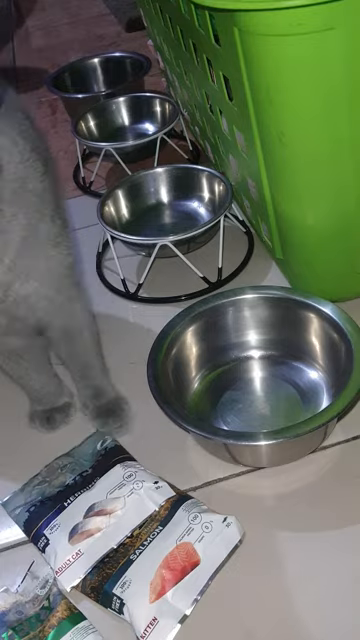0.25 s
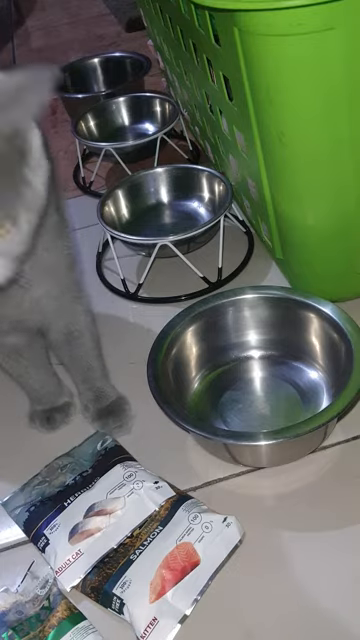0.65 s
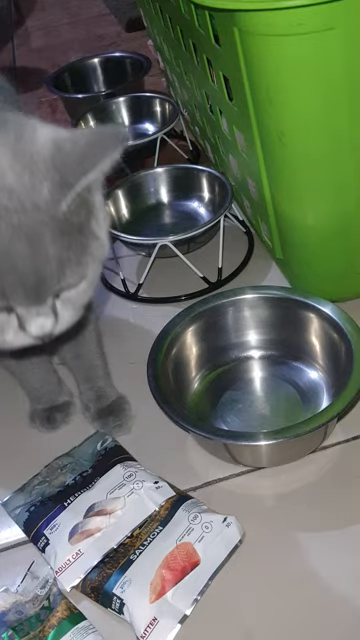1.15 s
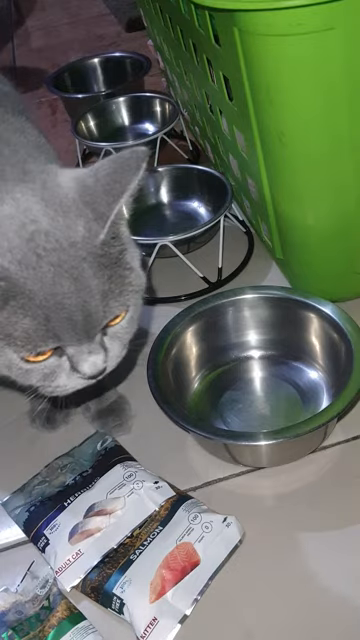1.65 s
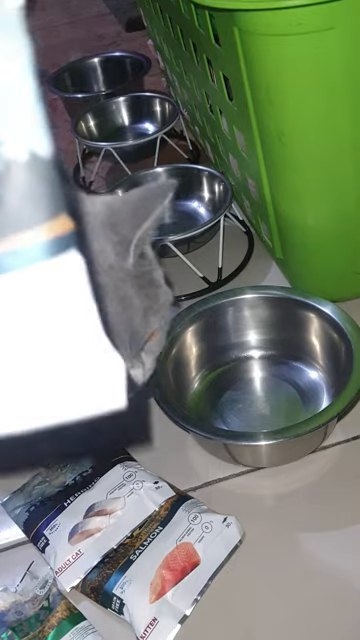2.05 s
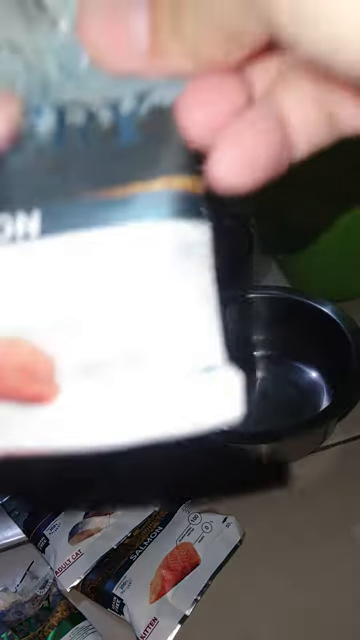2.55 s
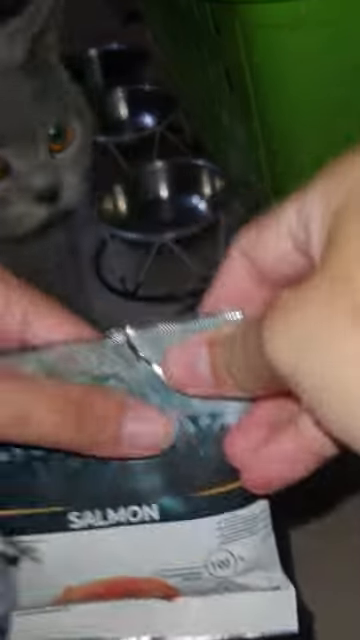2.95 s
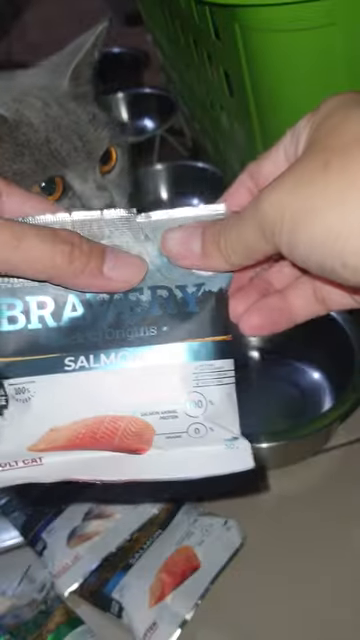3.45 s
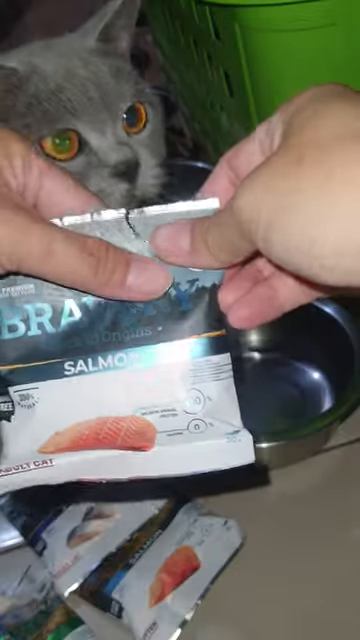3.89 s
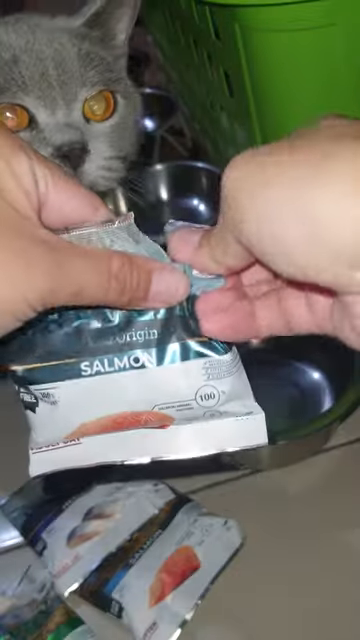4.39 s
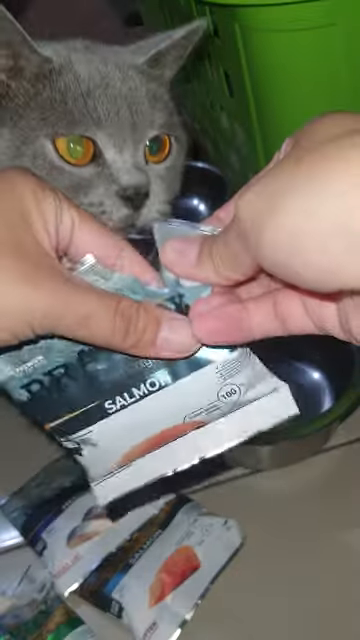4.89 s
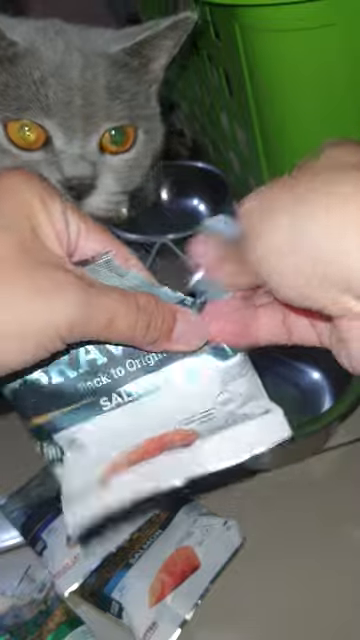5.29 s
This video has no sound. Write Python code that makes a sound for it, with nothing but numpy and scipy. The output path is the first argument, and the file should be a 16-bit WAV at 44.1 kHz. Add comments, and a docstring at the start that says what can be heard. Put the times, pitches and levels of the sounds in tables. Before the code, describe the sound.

A scraping load drops onto a hollow box with a bright metallic clink, then hands crinkle and tear a foil pouch over low motor hum.

```python
"""Motors hum over a low rumble in a tiled room; near the phone something scrapes, clacks and jingles, and a load
drops on a hollow box, then hands crinkle and tear a foil pouch close by. Struck box, foil and bumps are noise
bursts or sines through resonances, metal parts are decaying sines, rustles and scrapes are coloured stereo
noise with moving levels, and the motors are steady-pitched sines. Foil, bumps and blows also excite a room tail."""
import sys
import numpy as np
from scipy import signal
from scipy.fft import rfft, irfft, next_fast_len
from scipy.io import wavfile
from scipy.ndimage import uniform_filter1d, map_coordinates

SR = 44100
rng = np.random.default_rng(int(sys.argv[2]) if len(sys.argv) > 2 else 0)


def to_wav(s):
    """Save 16-bit WAV."""
    ch = np.atleast_2d(s).T  # columns
    pcm = np.round(np.clip(ch, -1, 1) * 32767)  # PCM
    wavfile.write(sys.argv[1], SR, pcm.astype(np.int16))


N = 243873

# Creases that snap in the foil. Each row: start in seconds, strength in dB, panel pitch in Hz,
# treble level in dB, pitch of the loose corner in Hz.
CREASES = [(1.834, -42, 3200, -20, 800), (2.334, -35, 1980, -1, 1140), (2.3696, -35.5, 3080, -15, 3200),
           (2.4207, -21.5, 2270, 0, 3100), (2.432, -17.5, 3900, -6, 1040), (2.52, -31, 2560, 7, 1340),
           (2.548, -28, 2200, 9, 1770), (2.576, -28.5, 4800, -9, 2920), (2.6245, -20.5, 5250, 43, 810),
           (2.641, -27, 2450, -20, 1010), (2.649, -29, 6000, 10, 1500), (2.691, -33.5, 1900, -25, 1300),
           (2.701, -31.5, 1400, -27, 1010), (2.759, -36, 2800, -13, 3450), (2.913, -31, 2600, -25, 1520),
           (2.9253, -20, 2160, -1, 2800), (2.946, -35, 2500, -20, 2400), (2.9819, -23.5, 2350, -5, 2500),
           (2.993, -38, 6000, -20, 3000), (3.02, -34, 1950, -3, 1610), (3.117, -37, 3720, -20, 2000),
           (3.356, -35.5, 2370, -8, 1500), (3.361, -29.5, 2700, -1, 2920), (3.9487, -23.5, 3620, 15, 1110),
           (3.981, -22.5, 3000, -2, 1190), (4.0972, -27, 3000, -1, 1310), (4.1083, -20, 5600, -30, 4800),
           (4.2603, -34, 1360, -18, 1380), (4.271, -19.5, 5900, 18, 3920), (4.2787, -19, 1470, 12.5, 1320),
           (4.313, -28, 3670, 17.5, 1790), (4.3537, -27.5, 3680, 12, 3440), (4.364, -19, 4600, -15, 1930),
           (4.431, -22, 4150, 10.5, 1340), (4.462, -33, 1920, -15, 985), (4.52, -15.5, 5600, -25, 2620),
           (4.5335, -20.5, 2010, -28, 1320), (4.579, -20, 3480, -19, 2100), (4.588, -22.5, 2200, -20, 1820),
           (4.597, -18, 5350, 4, 940), (4.609, -24, 3200, -12, 2430), (4.614, -10, 3570, 14, 1310),
           (4.653, -23, 5100, -21, 2730), (4.7103, -19, 2550, 3, 920), (4.7236, -11.5, 4500, -15, 1150),
           (4.7386, -9.5, 5270, -7, 4300), (4.776, -26, 2580, -10, 2470), (4.8004, -20.5, 4640, -20, 2640),
           (5.0163, -17.5, 4800, 3, 1000), (5.086, -26, 2980, -6, 1310), (5.0927, -26.5, 4430, -2, 2400),
           (5.1931, -30.5, 3430, 1, 1210), (5.203, -31.5, 2780, 0, 1440), (5.3086, -25, 1280, 10, 1390),
           (5.3417, -22, 2050, 9, 1350), (5.349, -16, 3840, 2, 910), (5.359, -24, 2550, -10, 1180),
           (5.3672, -3.5, 4470, -9, 2040), (5.3868, -14, 5430, -10, 1890), (5.4103, -5.5, 7900, 14, 5770),
           (5.418, -38, 2200, -20, 1090), (5.4612, -19, 3630, 8, 2250)]
# Where the pouch is held. Each row: time in seconds, left minus right in dB.
POUCH_SIDE = [(2.15, -15), (2.4, 0), (2.7, 3), (2.8, -5), (3.05, -6), (3.4, -4), (4.6, -3.5), (5.53, -5)]
# How alike the two ports hear a wide sound. Each row: frequency in Hz, left-right likeness (1 is identical).
PORT_LIKENESS = [(60, 0.3), (290, 0.8), (640, 0.21), (1400, -0.34), (3000, -0.0081)]


def snaps():
    """A crease flips: a spike and a few ms of chatter ring the foil panel, its loose corner and its facets."""
    mix, t = np.zeros((2, N)), np.arange(SR // 25) / SR
    crack_db = 5.5  # peak of a snap over its strength
    for s, strength_db, hz, top_db, corner_hz in CREASES:
        chatter = rng.standard_normal((3, len(t)))
        facets = hz * np.exp(0.537 * rng.standard_normal((6, 2, 1)))  # each port faces other facets
        burst = (chatter[0] + chatter[1:]) * amp(-60 * t / 0.019) * (1 - np.exp(-t / 0.0007))
        burst[:, 14] += 7  # the spike, 0.3 ms in

        def foil(f):
            panel = 0.33 * resonance(hz, 2.4 * hz)(f) ** 2
            corner = 0.79 * resonance(corner_hz, 0.45 * corner_hz)(f) ** 2
            small = 0.23 * sum(resonance(c, 0.09 * c)(f) for c in facets)
            treble = amp(top_db - 16.5) * resonance(12000, 9000)(f) ** 2
            return panel + corner + small + treble

        side_db = np.interp(s, *np.transpose(POUCH_SIDE))
        add(mix, s, filtered(burst, foil), strength_db + crack_db, side_db)
    return lead(mix, 0.00013)


def rustle():
    """Fingers slide on the film: lumpy noise, fine crackle, sheen and the bag's low crumple; snaps stir it up."""
    # Fingers working the pouch. Each row: time in seconds, rustle in dB, sheen in dB, low crumple in dB.
    hands = [(1.75, -81.5, -81, -71), (1.86, -64.5, -73, -56.5), (1.93, -81.5, -79, -69.5),
             (2.29, -74, -82, -64), (2.39, -55, -65, -46), (2.5, -53, -59, -49), (2.55, -42, -61, -44.5),
             (2.68, -52, -50, -51), (2.8, -55.5, -58.5, -56.5), (3.3, -55.5, -54.5, -58),
             (3.4, -62, -65, -59), (3.65, -69.5, -71.5, -66), (3.95, -56, -56, -61.5), (4.2, -60, -78, -56),
             (4.3, -52, -71, -70), (4.6, -52, -57, -52.5), (4.72, -52, -74, -53), (4.89, -53.5, -43, -59.5),
             (5.09, -49.5, -91, -48.5), (5.16, -58.5, -66, -57), (5.32, -58.5, -61, -53),
             (5.53, -55, -57, -56)]
    # Colours of film, sheen and bag. Each row: frequency in Hz, relative level in dB per Hz.
    film_colour = [(500, 1), (1200, 1.5), (3000, -3.5), (6000, -3.5), (9000, -10), (15800, -21)]
    sheen_colour = [(4000, -30), (7000, -4), (10000, -8.5), (15000, -1.5), (15800, -12)]
    bag_colour = [(200, 6.5), (350, 10.5), (900, 1.5), (1600, -34)]
    slide_db, shine_db, bag_db = curves(hands)
    s, strength_db = np.transpose(CREASES)[:2]
    # the film strains before each snap and settles after it
    rise = 0.011  # s
    settle_db = swells(s - rise, 0 * s + rise, 0 * s, strength_db - 28.5, fall_db_s=295)
    settle = amp(settle_db)
    film = np.hypot(amp(slide_db), settle)
    sheen = np.hypot(amp(shine_db), amp(-7) * settle)
    mix = film * rush(film_colour, [(0, 0.0074)], grain_db=3.0, rate=190, patchy_db=2.0)
    mix += amp(-1.5) * film * crackle(1300, spread_db=4.0)
    mix += sheen * rush(sheen_colour, [(0, 0.01)], grain_db=1.0, rate=78, patchy_db=2.5)
    mix += amp(bag_db) * rush(bag_colour, PORT_LIKENESS, grain_db=3.5, rate=50)
    side_db = np.interp(np.arange(N) / SR, *np.transpose(POUCH_SIDE))
    return mix * amp(side_db * [[0.5], [-0.5]])


def crackle(rate, spread_db):
    """Tiny creases at random moments, rate a second, each a damped panel of its own pitch and side."""
    draw = rng.random((int(rate * N / SR), 5))
    moment, pitch, size, side, delay = (draw[:, k:k + 1] for k in range(5))
    t = np.arange(200) / SR
    hz = 700 * 9 ** pitch
    level_db = -spread_db * np.log(1 - 0.97 * size) - 60 * t * hz / 14  # 60 dB down after 14 cycles
    grain = np.sqrt(hz) * amp(level_db) * np.sin(2 * np.pi * hz * t)
    start = (moment * N).astype(int) + np.arange(200)
    ports = []
    for k in range(2):
        late = start + k * (12 * delay).astype(int)  # the right port lags by up to 11 samples
        ports.append(np.bincount(late.ravel(), (grain * np.abs(k - side)).ravel(), N + 300)[:N])
    return unit(np.array(ports))


def rubs():
    """A thumb slides over the film: smooth airy strokes of noise."""
    # Strokes. Each row: start in seconds, rise in seconds, held in seconds, level in dB.
    strokes = [(3.06, 0.039, 0.072, -50.5), (3.21, 0.03, 0.055, -56), (4.85, 0.013, 0.029, -47),
               (4.965, 0.028, 0.0084, -43)]
    # Each row: frequency in Hz, relative level in dB per Hz.
    stroke_colour = [(2200, -11), (3400, -1.5), (5500, -2.5), (7000, -13), (12000, -12)]
    s, rise, held, db = np.transpose(strokes)
    level_db = swells(s, rise, held, db, fall_db_s=500) + [[-2.2], [2.2]]  # stronger on the right
    return amp(level_db) * rush(stroke_colour, [(0, 0.045)], grain_db=-3.0, rate=98)


def bumps():
    """Soft bumps of hands and bag: one dull mode each, with the tick of the contact."""
    # Each row: start in seconds, peak in dB, pitch in Hz.
    contacts = [(1.834, -38, 345), (2.15, -42, 890), (2.285, -35.5, 410), (2.39, -32, 990),
                (2.533, -34, 460), (2.55, -31, 287), (2.719, -34, 880), (2.856, -32, 507), (3.132, -34, 75),
                (3.36, -22, 925), (4.444, -38, 1260), (4.777, -27, 334), (4.898, -33, 1190),
                (4.918, -34, 1260), (5.072, -28, 860), (5.412, -30.5, 344), (5.443, -33, 1160),
                (5.51, -23.5, 134)]
    mix, t = np.zeros((2, N)), np.arange(SR // 5) / SR
    for s, db, hz in contacts:
        fade = amp(-60 * t / (0.012 + 7 / hz))  # lower modes ring longer
        ring = np.sin(2 * np.pi * hz * t) * fade * (1 - np.exp(-t / 0.00053))
        noise = rng.standard_normal((2, len(t))) * amp(-60 * t / 0.042)
        tick = filtered(noise, lambda f: resonance(1.8 * hz, 2.5 * hz)(f) ** 2)
        add(mix, s, ring + 0.91 * tick, db, -3)
    return lead(mix, 0.000067)


def knocks():
    """Blows on the hollow box: a soft push and some ms of rattle drive its modes."""
    # Each row: start in seconds, peak in dB, boost of the modes under 250 Hz in dB.
    blow_rows = [(0.268, -24.5, -1), (0.294, -24, 10), (0.75, -28, -4), (0.784, -26, -7), (0.863, -25, -6),
                 (0.898, -17.5, -25), (0.955, -15, -8), (0.967, -10, -19), (1.0, -1.5, -18),
                 (1.01, -12.5, -15), (1.056, -5, 2), (1.066, -14, -10), (1.102, -16, 25)]
    # Modes of the box. Each row: frequency in Hz, width in Hz, level in dB.
    modes = [(71.4, 10.5, 3.5), (150, 77, 0.5), (413, 69, 0.5), (498, 21, 9.5), (788, 118, 6),
             (920, 106, 6.5), (1760, 200, -6.5)]
    mix, t = np.zeros((2, N)), np.arange(SR // 4) / SR
    for s, db, bass_db in blow_rows:

        def box(f):
            total = 0
            for k, (hz, width, level_db) in enumerate(modes):
                boost_db = bass_db if hz < 250 else 0
                total = total + (-1) ** k * amp(level_db + boost_db) * resonance(hz, width)(f)
            return total

        chance = rng.standard_normal((3, len(t)))
        push = t / 0.000386 * np.exp(-t / 0.00026)
        rattle = 0.38 * amp(-60 * t / 0.047) * (chance[0] + 0.36 * chance[1:])
        add(mix, s, filtered(push + rattle, box) * amp(-60 * t / 0.29), db, -2.5)
    return lead(mix, 0.00021)


def clinks():
    """Small metal parts clink: decaying sines, rebalanced and slightly retuned at each contact."""
    # Each row: start in seconds, peak in dB.
    contacts = [(0.785, -40), (0.9542, -27), (0.9644, -18), (0.985, -21), (1.0394, -36)]
    # Metal parts. Each row: frequency in Hz, level in dB.
    parts = [(8760, -8.5), (11140, -4), (13460, -3), (14800, -9), (15500, 6)]
    mix, t = np.zeros((2, N)), np.arange(SR // 3) / SR
    for s, db in contacts:
        ring = 0
        for hz, level_db in parts:
            port_db = level_db + rng.normal(0, 2.7, (2, 1))  # each port hears its own balance
            cycles = hz * rng.normal(1, 0.0078) * t + rng.random((2, 1))
            ring = ring + amp(port_db - 60 * t / 0.13) * np.sin(2 * np.pi * cycles)
        add(mix, s, ring, db, -4)
    return mix


def shuffle():
    """The load is shoved along: swelling noise booms in the box, scrapes the tiles and hisses."""
    # Each row: start in seconds, rise in seconds, held in seconds, boom in dB, scrape in dB, hiss in dB.
    shoves = [(0.001, 0.0013, 0.03, -47.5, -56, -58.5), (0.091, 0.004, 0.01, -45.5, -55, -67),
              (0.2, 0.056, .01, -70, -55, -56), (0.255, 0.014, 0.02, -36.5, -43.5, -45),
              (0.553, 0.01, 0.012, -44.5, -46, -56), (0.724, .006, .015, -64, -64, -58),
              (0.742, 0.0074, 0.033, -40.5, -46, -50), (0.78, 0.0042, 0.023, -30.5, -38.5, -38),
              (0.81, 0.076, 0.086, -30, -40.5, -39), (0.916, 0.044, 0.016, -24, -27.5, -30.5),
              (0.997, 0.0051, 0.0052, -17, -33, -33), (1.049, 0.0088, 0.018, -25, -37, -38),
              (1.173, 0.0044, 0.01, -58, -53, -43.5)]
    # Colours of the three noises. Each row: frequency in Hz, relative level in dB per Hz.
    boom_colour = [(40, -16), (100, -9), (200, -7), (240, -22.5), (465, -10.5), (600, -19), (800, -8.5),
                   (1190, -23.5), (1800, -30)]
    scrape_colour = [(900, 2), (1800, -0.5), (3000, -1), (6000, -2), (9000, -6.5)]
    hiss_colour = [(6000, -26), (9000, 2.5), (13000, 8.5), (15800, 9)]
    s, rise, held, boom_db, scrape_db, hiss_db = np.transpose(shoves)
    boom = rush(boom_colour, [(60, 0.98), (500, 0.99), (1200, 0.89)], grain_db=1.5, rate=50)
    boom = shaded(lead(boom, 0.00028))
    scrape = rush(scrape_colour, [(0, 0.06)], grain_db=1.5, rate=220, patchy_db=2.0)
    hiss = rush(hiss_colour, [(0, 0.089)], grain_db=0.9, rate=180, patchy_db=2.5)
    mix = amp(swells(s, rise, held, boom_db, fall_db_s=221)) * boom
    mix += amp(swells(s, rise, held, scrape_db, fall_db_s=170)) * scrape
    mix += amp(swells(s, rise, held, hiss_db, fall_db_s=190)) * hiss
    return amp([[-2.5], [2.5]]) * mix


def clacks():
    """Far clacks: a sharp start that flutters away as noise."""
    # Each row: start in seconds, peak in dB, time to fall 60 dB in seconds.
    clack_rows = [(0.094, -32, 0.29), (0.558, -30, 0.23), (1.2172, -34.5, 0.17)]
    # Each row: frequency in Hz, relative level in dB per Hz.
    clack_colour = [(500, 12), (1000, -29), (1600, -2.5), (3000, 3), (5000, 6.5), (9000, 5), (15800, -1)]
    mix, t = np.zeros((2, N)), np.arange(SR // 3) / SR
    for s, db, t60 in clack_rows:
        fade = amp(-60 * t / t60 + 1.4 * wobble(113)[:len(t)])
        noise = filtered(rng.standard_normal((2, len(t))), colour(clack_colour))
        add(mix, s, noise * fade, db, -1)
    return mix


def background():
    """Clean lines of several motors, as sines, over the noise of rumble and air; all sag and return together."""
    # Level of the whole background. Each row: time in seconds, level in dB.
    drift = [(0, -0.5), (1.2, -1), (1.6, -5), (2.2, -5.5), (2.7, -1), (4, -1.5), (5.53, 0)]
    # Motor lines. Each row: frequency in Hz, relative level in dB.
    hum = [(86.2, -9), (141.5, -16), (147.21, -4), (188.7, -14), (196.12, 0), (635.2, -24), (733.4, -17),
           (3725, -35)]
    # Colours of rumble and air. Each row: frequency in Hz, relative level in dB per Hz.
    rumble_colour = [(30, -31), (42, 5.5), (60, 0), (90, -1.5), (130, -3.5), (170, -7.5), (230, -20.5)]
    air_colour = [(200, -0.5), (310, -0.5), (520, -10.5), (700, -1.5), (1000, -8.5), (1600, -15),
                  (3200, -25), (3750, -22), (4400, -33), (5600, -27), (15800, -32.5)]
    drift_db, = curves(drift)
    t = np.arange(N) / SR
    lines = sum(amp(db) * np.sin(2 * np.pi * (hz * t + rng.random())) for hz, db in hum)
    low = amp(-43) * unit(lines) + amp(-47) * rush(rumble_colour, PORT_LIKENESS)
    low = amp([[-2.5], [2.5]]) * low  # stronger on the right
    return amp(drift_db) * (low + amp(-54) * rush(air_colour, PORT_LIKENESS))


def room(x):
    """Tiled room: a noise tail 4.5 ms late; each frequency dies at its own speed, long waves reach ports alike."""
    # Each row: frequency in Hz, time to fall 60 dB in seconds.
    tiles = [(200, 0.49), (2000, 0.35), (10000, 0.33)]
    hz, t, z = signal.stft(rng.standard_normal((2, SR // 2)), SR, nperseg=256)
    apart = np.clip(hz / 900, 0, 1)[:, None]
    z = np.array([z[0] + apart * z[1], z[0] - apart * z[1]]) / np.sqrt(1 + apart ** 2)
    t60 = np.interp(hz, *np.transpose(tiles))[:, None]
    tail = signal.istft(z * amp(-60 * t / t60), SR, nperseg=256)[1]
    late_tail = np.pad(tail, ((0, 0), (200, 0)))
    return signal.fftconvolve(x, late_tail / np.linalg.norm(tail[0]), axes=1)[:, :N]


def shaded(x):
    """The left port is shaded from the box's upper modes: a broad dip at 720 Hz."""
    return filtered(x, lambda f: np.array([1 - 0.8 * resonance(720, 330)(f), np.ones(len(f))]))


def lead(x, seconds):
    """The left port hears it first: opposite phase slopes, half the time each way."""
    return filtered(x, lambda hz: np.exp(1j * np.pi * seconds * hz * np.array([[1], [-1]])))


def swells(start, rise, held, db, fall_db_s):
    """Summed power, in dB, of strokes that rise, hold and fall away."""
    power, t = np.zeros(N), np.arange(SR // 2) / SR
    for s, r, h, top_db in zip(start, rise, held, db):
        part = power[round(s * SR):][:len(t)]
        fall_db = fall_db_s * np.clip(t - r - h, 0, None)
        stroke = np.clip(t / r, 0, 1) ** 4 * amp(2 * (top_db - fall_db))
        part += stroke[:len(part)]
    return 10 * np.log10(power + 1e-12)


def rush(spectrum, alike, grain_db=0, rate=300, patchy_db=0):
    """Stereo noise of rms 1; grain makes it lumpy, patches shift its colour from moment to moment."""
    f, likeness = np.transpose(alike)
    z = signal.stft(rng.standard_normal((2, N)) * amp(grain_db * wobble(rate)), nperseg=256)[2]
    field = uniform_filter1d(rng.standard_normal(z.shape[1:]), size=10, axis=0)
    field = uniform_filter1d(field, size=12, axis=1)
    pair = signal.istft(z * amp(patchy_db * unit(field)), nperseg=256)[1][:, :N]

    def mid_side(hz):
        turn = np.arccos(np.clip(np.interp(hz, f, likeness), -1, 1)) / 2
        return colour(spectrum)(hz) * [np.cos(turn), np.sin(turn)]

    mid, side = filtered(pair, mid_side)
    return unit(np.array([mid + side, mid - side]))


def add(mix, s, sound, db, pan_db):
    """Lays a sound into mix at second s; db is its mono peak, pan_db left minus right."""
    part = mix[:, round(s * SR):][:, :sound.shape[1]]
    gain = amp(db + np.array([[pan_db], [-pan_db]]) / 2)
    part += (gain * sound / np.abs(sound.mean(0)).max())[:, :part.shape[1]]


def resonance(hz, width):
    """Causal response of one mode, width in Hz."""
    return lambda f: 1j * f * width / (hz * hz - f * f + 1j * f * width)


def filtered(x, response):
    """x times a complex response of frequency."""
    n = x.shape[-1]
    m = next_fast_len(n + 8192)
    return irfft(rfft(x, m) * response(np.fft.rfftfreq(m, 1 / SR)), m)[..., :n]


def colour(points):
    """Gain against frequency from (Hz, dB) points on a log axis, -120 dB outside."""
    f, v = np.transpose(points)
    return lambda hz: amp(np.interp(np.log(hz + 1), np.log(f + 1), v, -120, -120))


def curves(rows):
    """One value per sample for each column after the time, -120 outside."""
    s, *cols = np.transpose(rows)
    return [np.interp(np.arange(N) / SR, s, c, -120, -120) for c in cols]


def wobble(rate):
    """A smooth random curve, rate knots a second."""
    return map_coordinates(rng.standard_normal(int(N * rate / SR) + 4), [np.arange(N) * rate / SR])


def amp(db):
    """Amplitude gain from dB."""
    return 10 ** (np.asarray(db) / 20)


def unit(x):
    """x scaled to rms 1."""
    return x / np.sqrt(np.mean(x ** 2) + 1e-20)


def scene():
    """Foil, bumps and blows, direct and through the room tail, with the other layers added dry."""
    near = snaps() + bumps()
    blows = shaded(knocks()) + clinks()
    tail = room(amp(-19.5) * near + amp(-13.0) * blows)
    return near + blows + tail + rustle() + rubs() + clacks() + shuffle() + background()


def record(dry):
    """The loudest peaks are rounded off, the deepest bass is weak, little sounds above 15.85 kHz and nothing
    above 16.99 kHz."""
    rounded = dry / (1 + np.abs(dry / 0.95) ** 4) ** (1 / 4)

    def response(hz):
        top = np.where(hz < 15850, 1, amp(-27)) * (hz < 16990)  # faint above 15.85 kHz, then silent
        return top / (1 + (34 / (hz + 1)) ** 6)

    return filtered(rounded, response)


dry = scene()
out = record(dry)
to_wav(out)
```